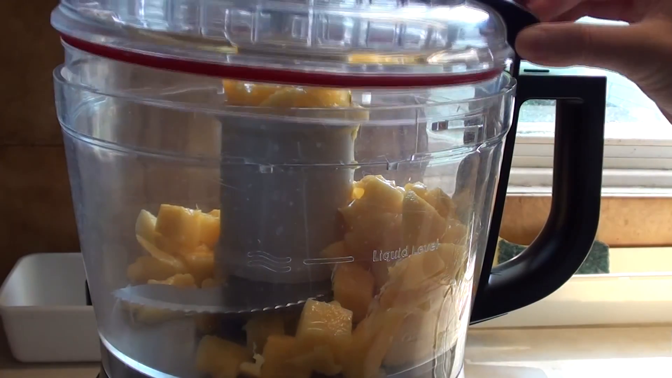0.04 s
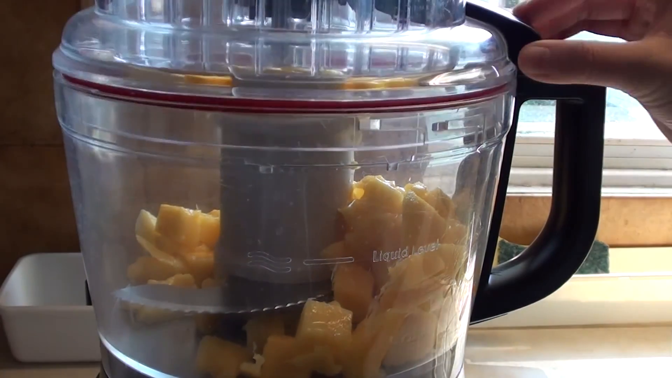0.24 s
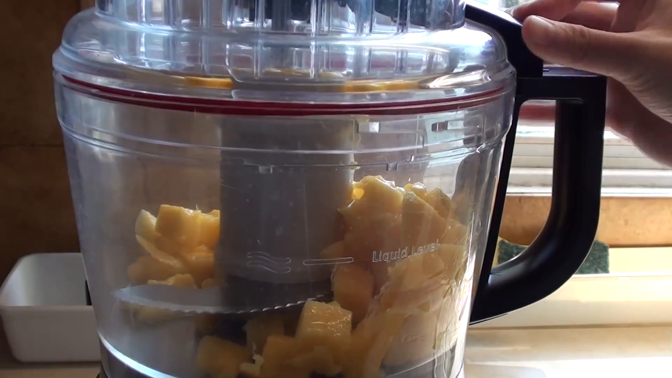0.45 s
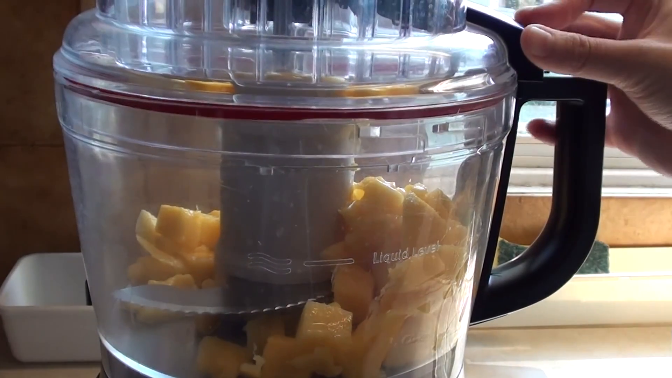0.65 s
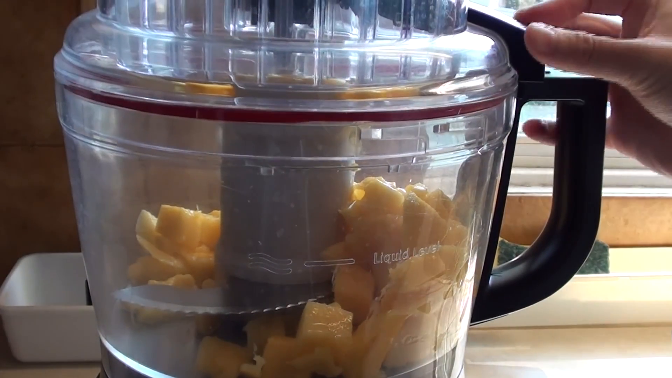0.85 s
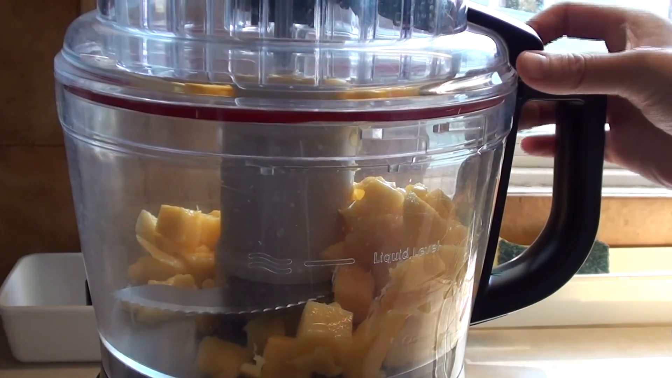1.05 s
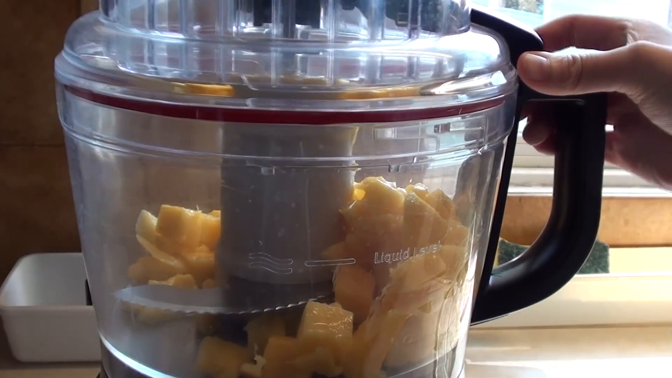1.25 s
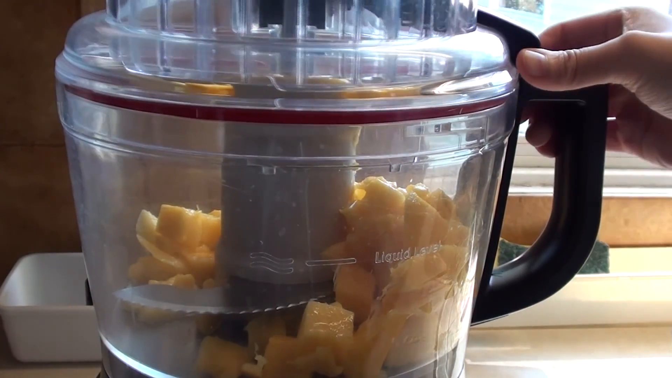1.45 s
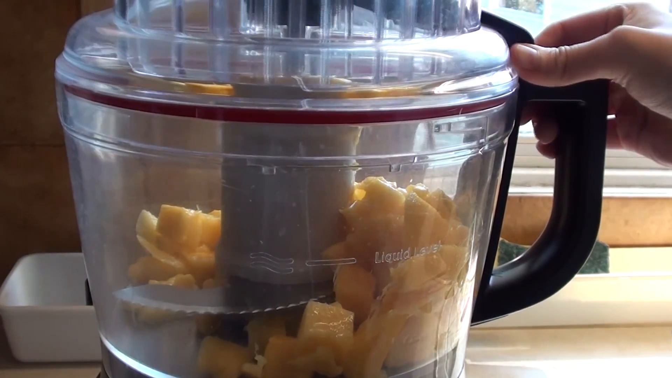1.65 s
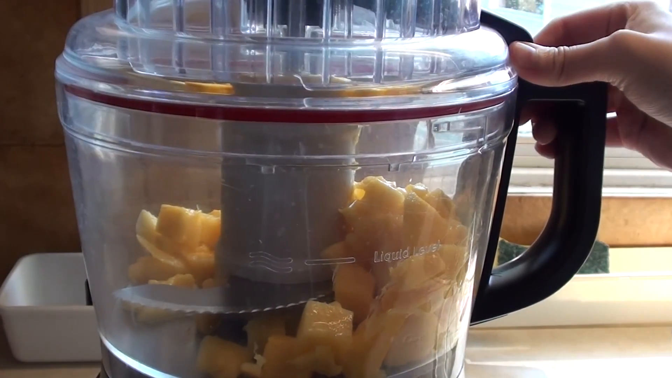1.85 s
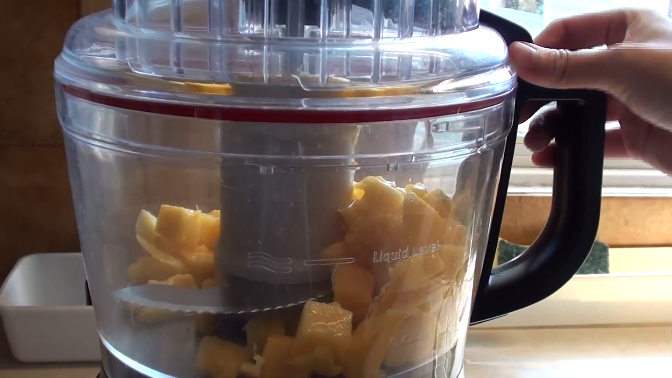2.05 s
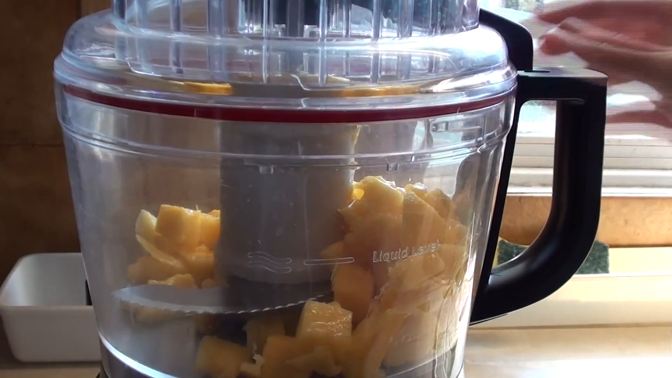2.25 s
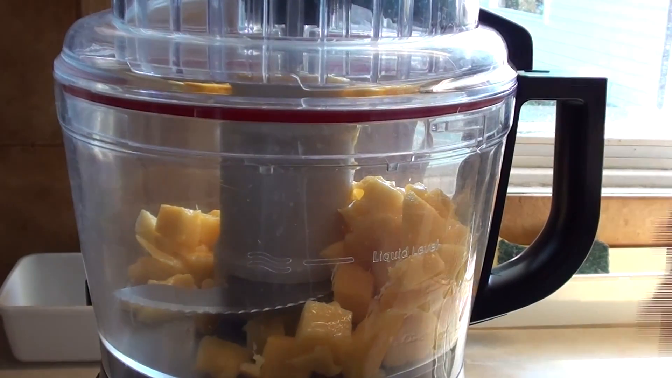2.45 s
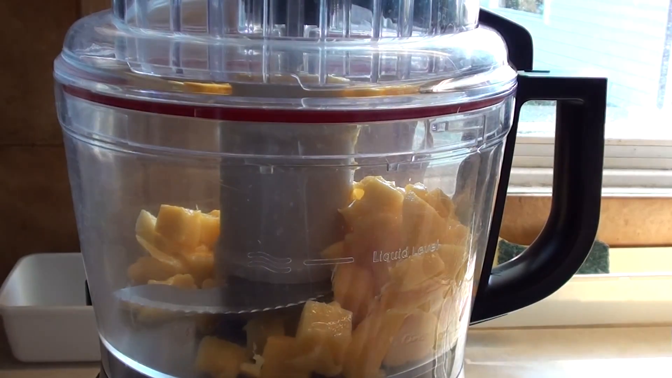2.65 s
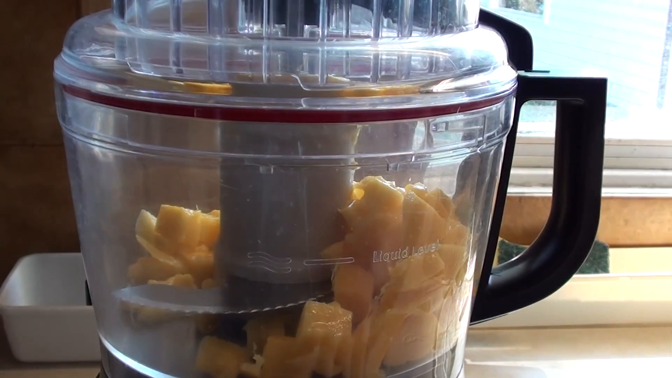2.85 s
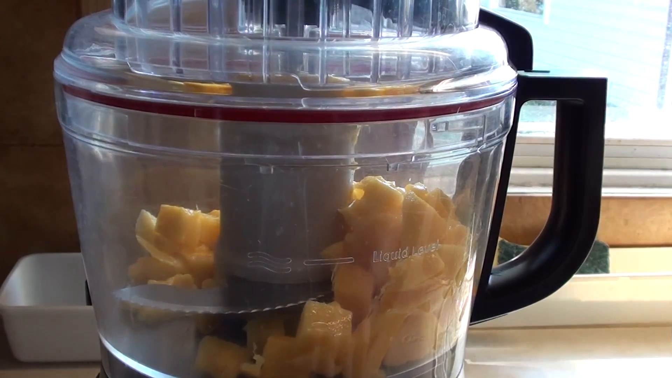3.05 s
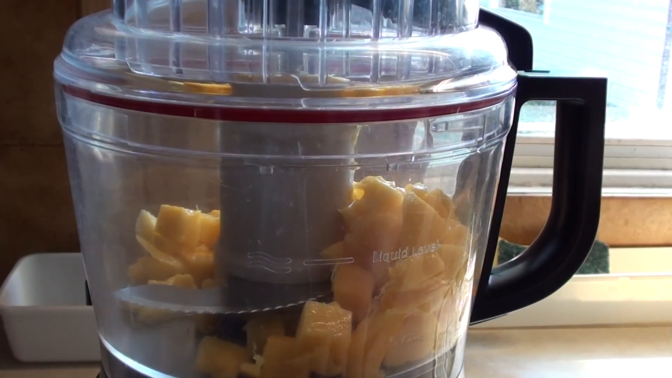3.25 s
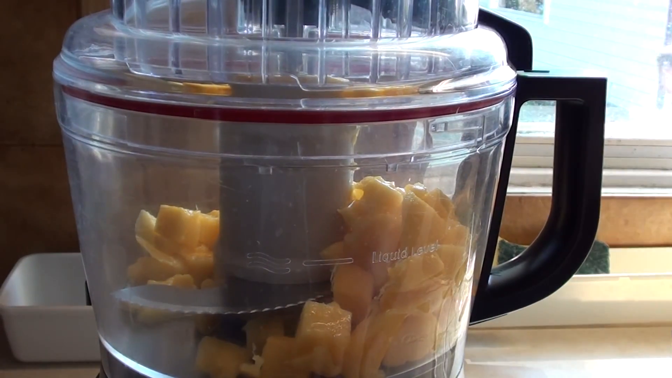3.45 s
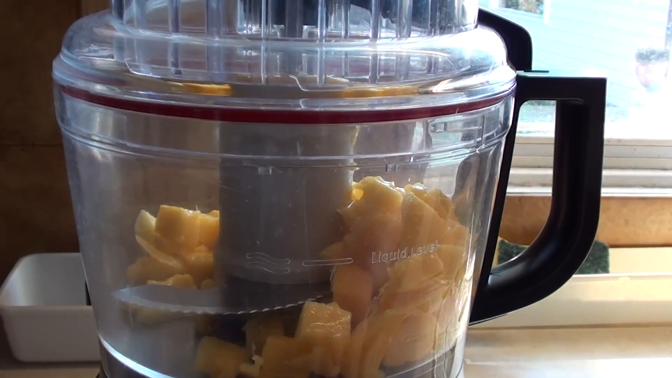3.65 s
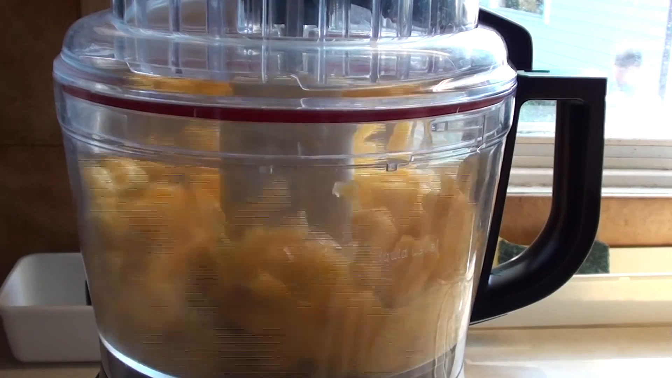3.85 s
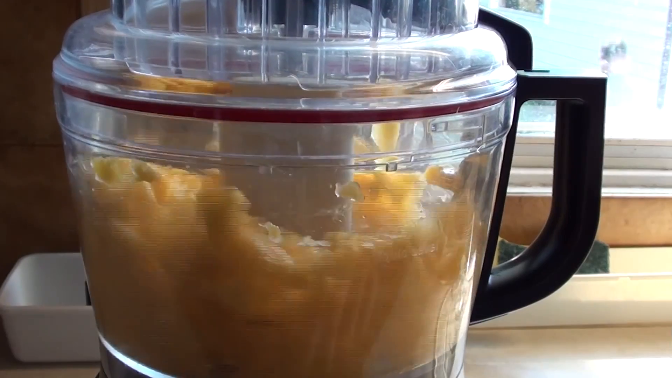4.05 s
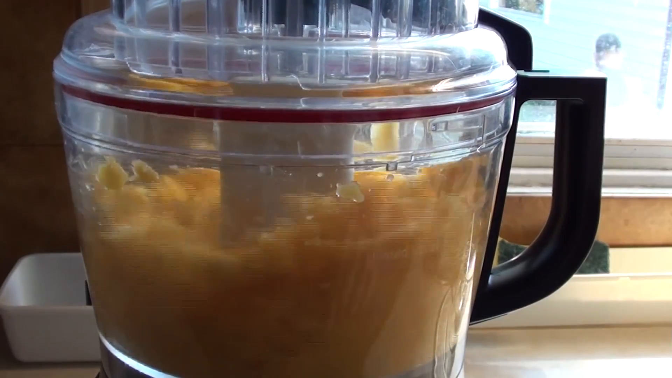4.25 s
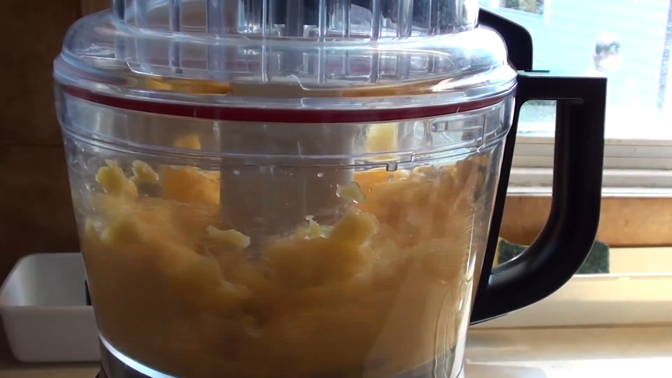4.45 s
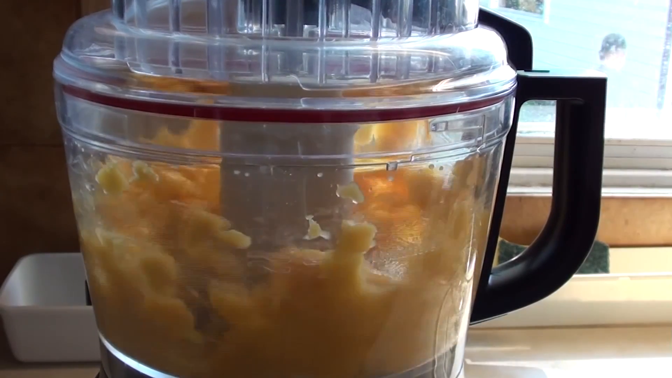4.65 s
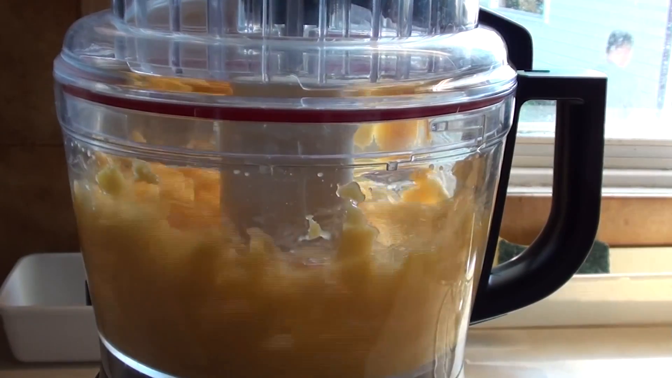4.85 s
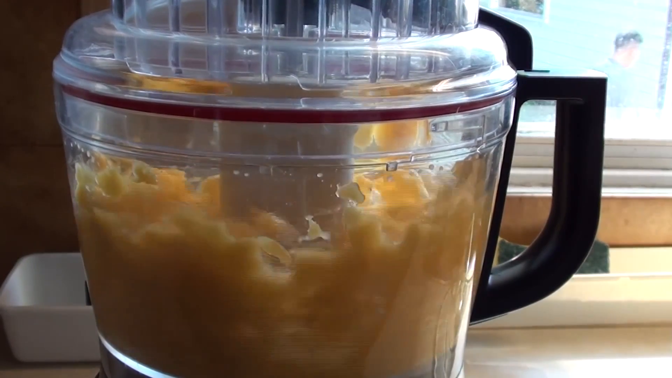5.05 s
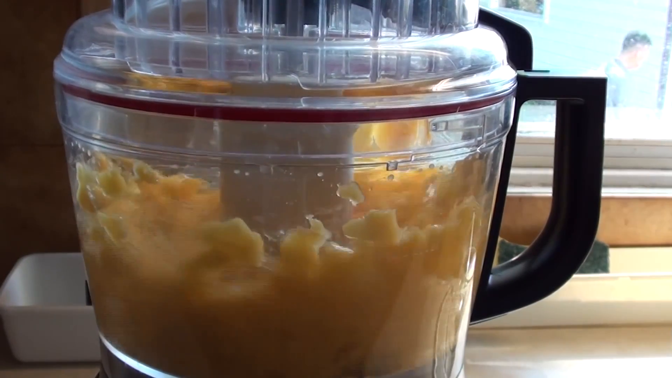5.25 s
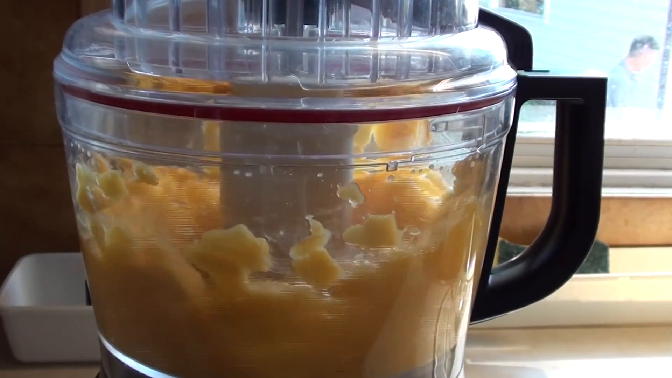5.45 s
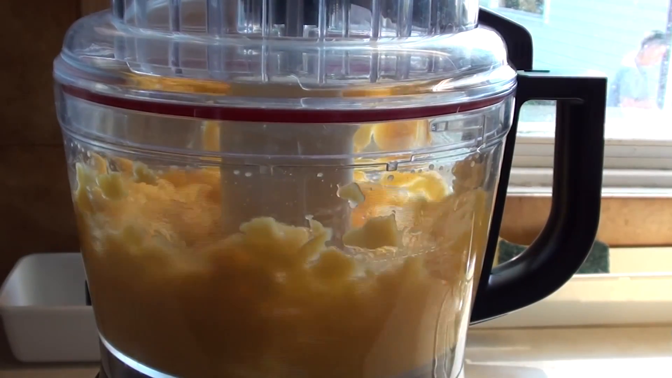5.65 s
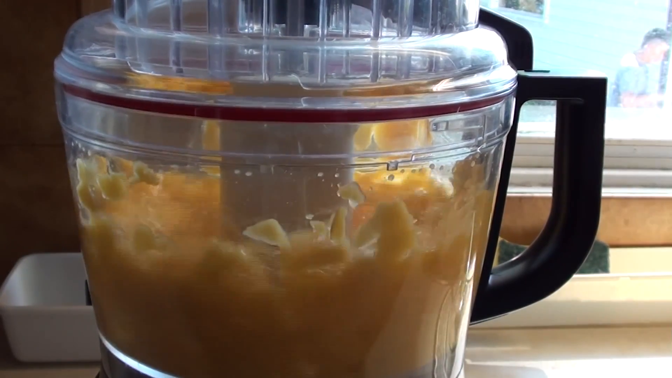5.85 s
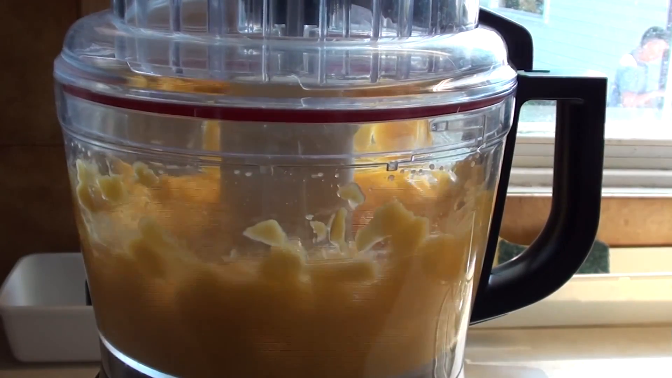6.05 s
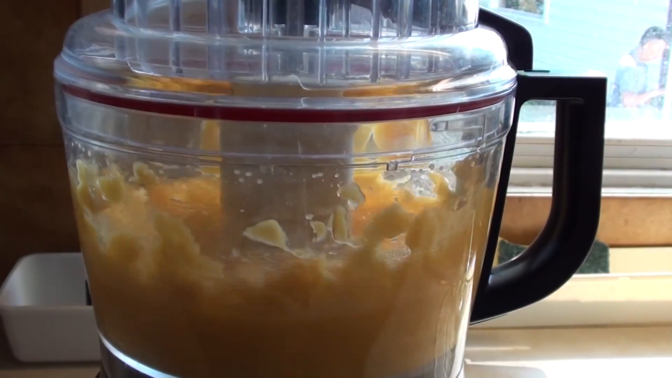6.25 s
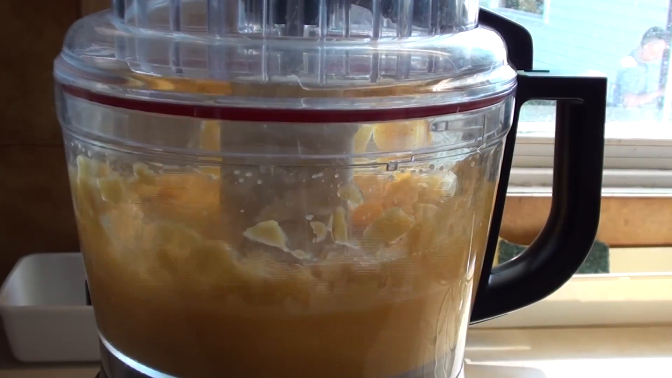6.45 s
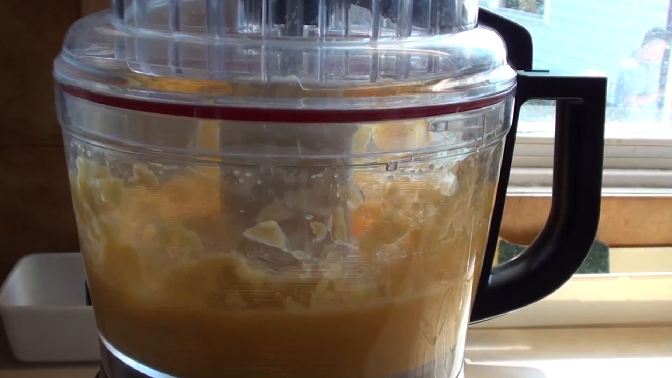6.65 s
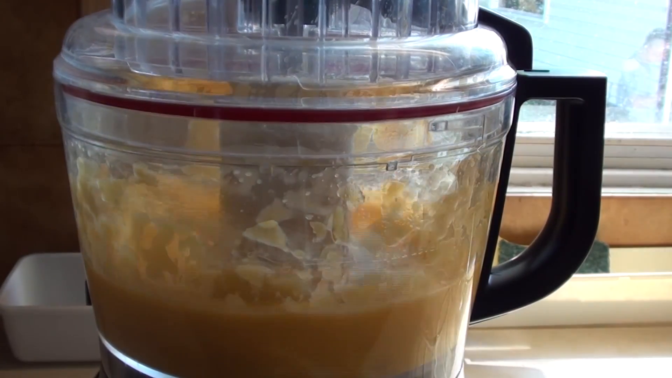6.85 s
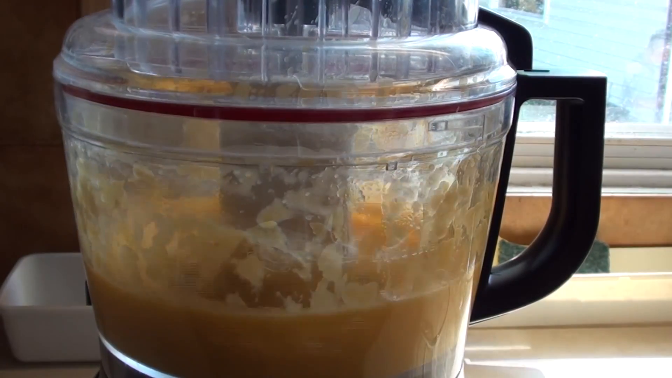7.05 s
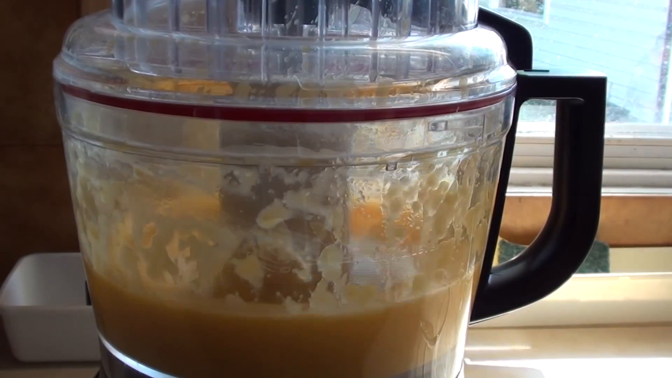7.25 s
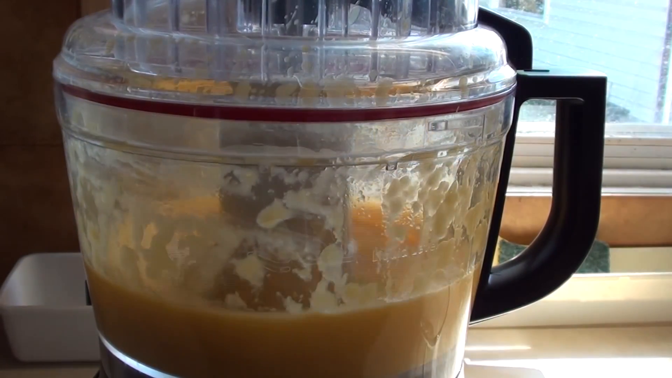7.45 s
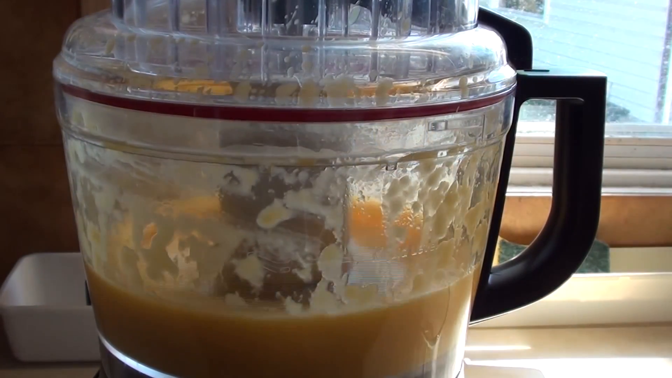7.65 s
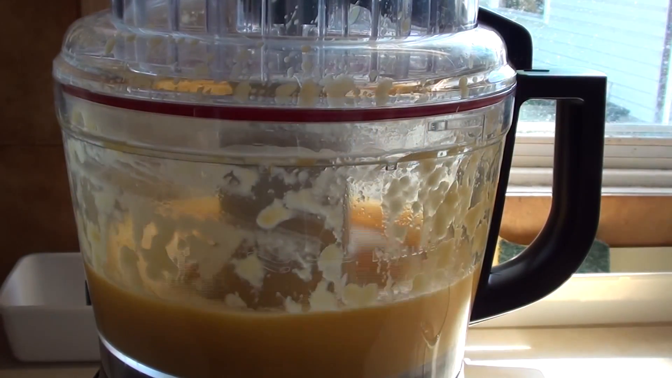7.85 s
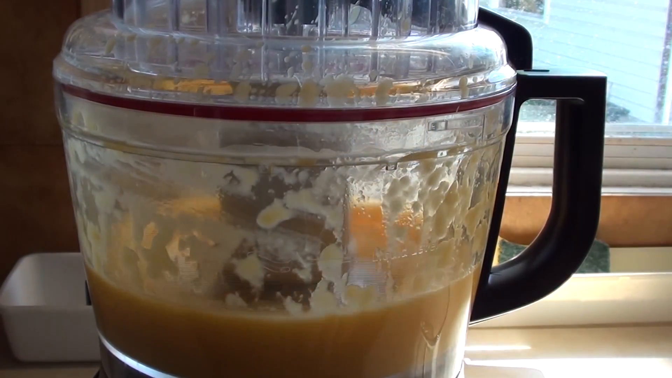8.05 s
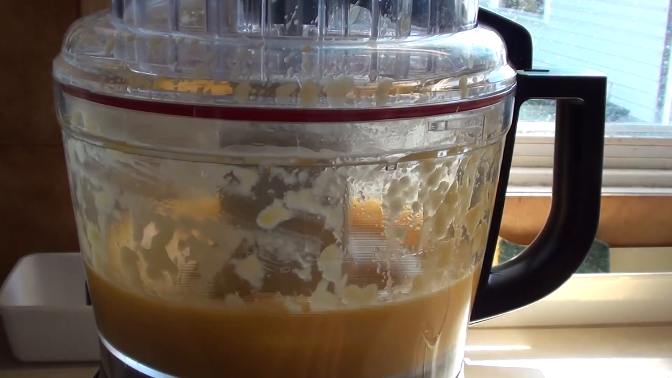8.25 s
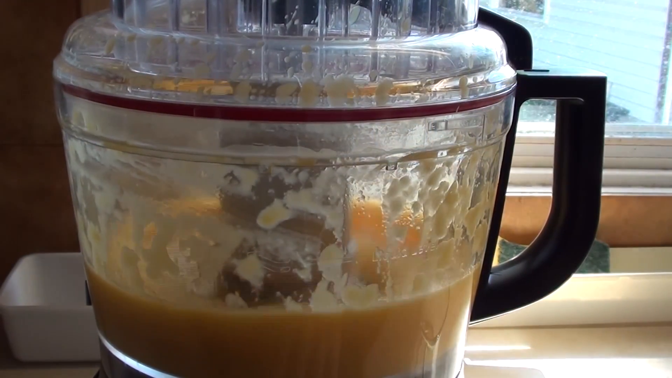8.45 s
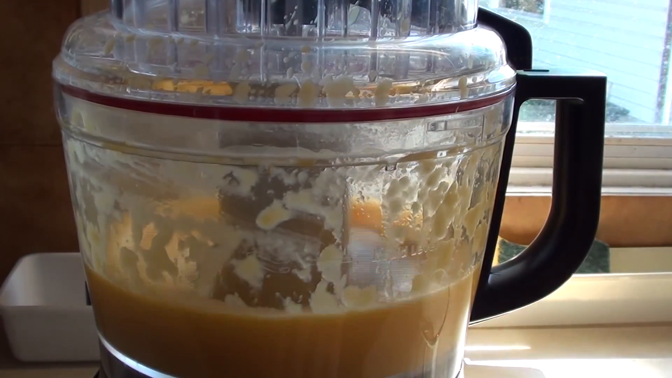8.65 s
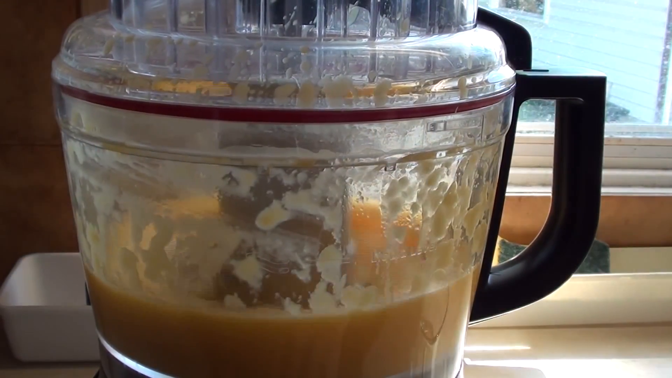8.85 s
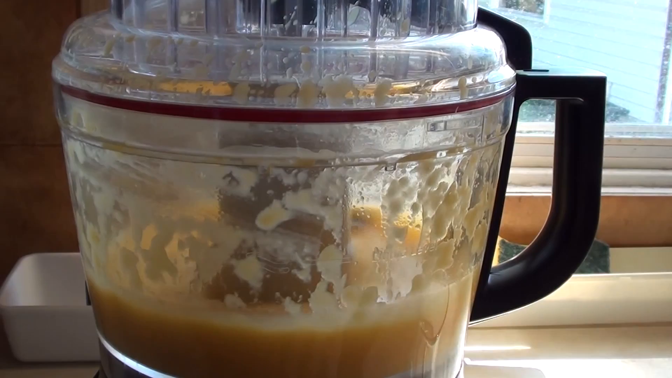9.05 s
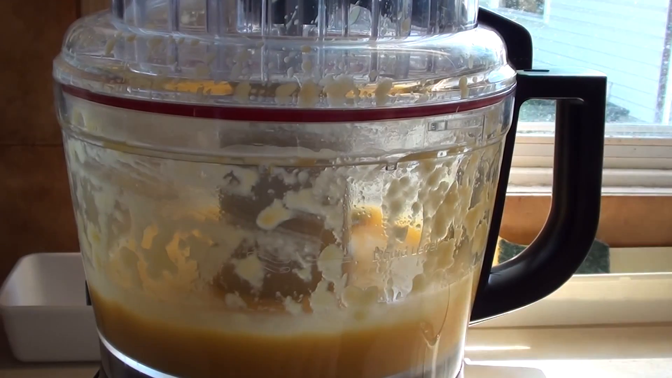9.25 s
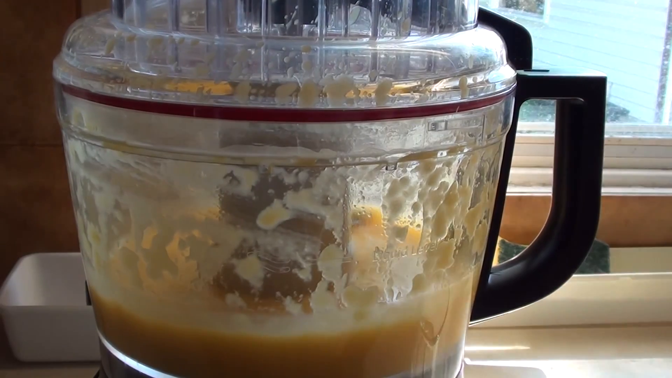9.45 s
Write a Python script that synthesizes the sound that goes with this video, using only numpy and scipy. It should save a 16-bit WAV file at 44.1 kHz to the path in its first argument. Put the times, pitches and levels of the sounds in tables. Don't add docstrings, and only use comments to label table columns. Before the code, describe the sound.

Close up in a small kitchen, a hand seats a thick plastic lid with a flurry of clicks and hollow knocks, then snaps the latch. A faint brushing and quiet hiss follow. A button clacks and the food processor starts abruptly, growling and whining as fruit chunks tumble, then running smoother with a fast regular knocking. It stops with jolting clicks and a brief final rub.

```python
import sys
import numpy as np
from scipy import signal
from scipy.fft import rfft, irfft, next_fast_len
from scipy.io import wavfile
from scipy.ndimage import uniform_filter1d

SR = 44100
rng = np.random.default_rng(int(sys.argv[2]) if len(sys.argv) > 2 else 0)


def pcm_store(signal):
    levels = np.round(np.clip(np.atleast_2d(signal), -1, 1) * 32767)
    wavfile.write(sys.argv[1], SR, levels.astype(np.int16).T)


def amplitude_ratio(level_db):
    exponent = np.asarray(level_db, float) / 20
    return 10 ** exponent


N = 419391
TIME = np.arange(N) / SR

# f/Hz, level/dB per Hz
BOWL_THUD = [(40, -12), (150, 1.5), (205, 1), (290, -2.5), (370, 0.5), (520, -2.5), (900, -6),
             (1500, -48.5)]
# f/Hz, level/dB per Hz
WALL_CRACK = [(300, -52), (800, -12.5), (1500, -3.5), (2500, -8.5), (4000, -16), (8000, -41)]


def evened(x):
    return x / np.sqrt(np.mean(x ** 2) + 1e-20)


def read(points, hz):
    f, value = np.transpose(points)
    return np.interp(np.log(hz + 1), np.log(f + 1), value)


def curves(rows):
    s, *columns = np.transpose(rows)
    return [np.interp(TIME, s, column) for column in columns]


def during(rows, fade_s=0.014):
    return np.clip(np.minimum(TIME - rows[0][0], rows[-1][0] - TIME) / fade_s, 0, 1)


def add(mix, s, sound):
    part = mix[round(s * SR):][:len(sound)]
    part += sound[:len(part)]


def shaped(x, gain):
    size = next_fast_len(x.shape[-1], real=True)
    spectrum = rfft(x, size) * gain(np.fft.rfftfreq(size, 1 / SR))
    return irfft(spectrum, size)[..., :x.shape[-1]]


def smooth_twice(x, first, second):
    return uniform_filter1d(uniform_filter1d(x, first, 0), second, 1 if x.ndim > 1 else 0)


def wander(length):
    return evened(smooth_twice(rng.standard_normal(N), length, length))


def noise(points, patchy_db=1.5, peaks=()):
    hz = np.fft.rfftfreq(1024, 1 / SR)
    real, imaginary, patches = rng.standard_normal((N // 256 + 5, 513, 3)).T
    patches = evened(smooth_twice(patches, 14, 8))
    colour = amplitude_ratio(read(points, hz))
    for f, width, db in peaks:
        colour = colour + amplitude_ratio(db) / (1 + ((hz - f) / (0.45 * width)) ** 2)
    z = (real + 1j * imaginary) * colour[:, None] * amplitude_ratio(patchy_db * patches)
    return evened(signal.istft(z, nperseg=1024, noverlap=768)[1][:N])


def ring(chance, gain, rise_s, t60, blow=0.37, tail=0.31):
    t = np.arange(len(chance)) / SR
    rise = (1 - np.exp(-t / rise_s)) ** 2
    decay = amplitude_ratio(-60 * t / (blow * t60)) + tail * amplitude_ratio(-60 * t / t60)
    sound = shaped(chance, gain) * rise * decay
    return sound / abs(sound).max()


def knock(crack_db, thud_db, tick_db, hz, chance):
    # f/Hz, level/dB per Hz
    latch_tick = [(1500, -8.5), (3500, -9.5), (5200, -3), (7500, 0), (10000, -8.5), (13000, -15),
                  (16000, -25)]
    t60 = np.clip(0.066 - 0.001 * (thud_db - crack_db), .015, .4)
    hardness = np.clip(0.021 * (tick_db - crack_db), -.7, .7)

    def wall_gain(f):
        return amplitude_ratio(read(WALL_CRACK, f)) + 1.25 / (1 + ((f - hz) / 110) ** 2)

    def latch_gain(f):
        return amplitude_ratio(read(latch_tick, f)) * (f / 7000 + .01) ** hardness

    crack = ring(chance[0], wall_gain, 0.00081, t60)
    thud = ring(chance[1], lambda f: amplitude_ratio(read(BOWL_THUD, f)), 0.0025, 1.8 * t60)
    tick = ring(chance[2], latch_gain, 0.00026, 0.87 * t60, blow=0.21, tail=0.16)
    return amplitude_ratio(crack_db) * crack + amplitude_ratio(thud_db + 0.4) * thud + amplitude_ratio(tick_db - 2.0) * tick


def set_down():
    level_db, t60 = -30.5, 0.37
    t = TIME[:SR // 2]
    dying = shaped(rng.standard_normal(SR // 2),
                   lambda f: amplitude_ratio(read(BOWL_THUD, f)) + 0.63 * amplitude_ratio(read(WALL_CRACK, 1.8 * f)))
    return evened(dying) * amplitude_ratio(level_db - 60 * t / t60)


def knocks():
    # t/s, crack level/dB, thud level/dB, tick level/dB, crack f/Hz
    seating = [(0.001, -44, -26, -55, 1040), (0.017, -38, -35, -56, 980), (0.111, -23, -41, -31, 1460),
               (0.117, -22, -36, -43, 1470), (0.142, -20, -31.5, -18.5, 1090),
               (0.161, -15.5, -19, -16.5, 2250), (0.184, -19, -29, -19, 1090),
               (0.207, -26.5, -41, -18.5, 1100), (0.276, -21, -38, -13, 1260), (0.341, -47, -51, -55, 1210),
               (0.495, -41, -39, -44, 1100), (0.521, -42, -60, -56, 1490), (0.54, -29.5, -56, -30, 2210),
               (0.555, -41, -50, -53, 1170), (0.568, -40, -42, -29, 2210), (0.574, -27, -40, -27, 1170),
               (0.588, -15.5, -20.5, -17.5, 870), (0.596, -20, -19.5, -22, 870),
               (0.599, -20, -29, -29, 725), (0.707, -37, -29.5, -55, 760), (0.741, -36, -57, -34, 990),
               (0.837, -42, -57, -34, 1430), (0.845, -25.5, -52, -29.5, 1010), (0.917, -39, -51, -42, 990)]
    # t/s, crack level/dB, thud level/dB, tick level/dB, crack f/Hz
    locking = [(1.009, -50, -46, -54, 865), (1.064, -37, -62, -18.5, 1130), (1.137, -30.5, -43, -34, 1320),
               (1.212, -46, -38.5, -43, 2270), (1.271, -42, -41, -56, 870), (1.331, -31, -40, -18, 1780),
               (1.362, -51, -65, -28, 880), (1.381, -24.5, -22.5, -43, 870), (1.427, -27, -40, -22, 1320),
               (1.465, -49, -34.5, -55, 850), (1.497, -28.5, -49, -19.5, 1320),
               (1.536, -25.5, -48, -18.5, 2340), (1.563, -30, -33, -33, 1834), (1.571, -26, -28, -29, 1190),
               (1.579, -29, -34, -21.5, 1190), (1.594, -30, -51, -27, 1190), (1.62, -30, -24, -40, 1570),
               (1.627, -28, -27.5, -6.5, 1340), (1.657, -34, -45, -19.5, 915),
               (1.679, -21.5, -39, -29, 1650), (1.682, -21, -26, -24, 900), (1.687, -15.5, -24, -15.5, 990),
               (1.692, -27, -36, -26, 1270), (1.708, -20, -14.5, -34, 865)]
    # t/s, crack level/dB, thud level/dB, tick level/dB, crack f/Hz
    letting_go = [
        (1.72, -29, -24, -40, 850),
        (1.982, -54, -39, -57, 1450),
        (2.007, -39, -54, -53, 1200),
        (2.015, -35, -41, -25.5, 1530),
        (2.034, -32, -45, -25, 1220),
        (2.055, -32, -55, -29, 1320),
        (2.101, -36, -50, -34, 1210),
        (2.118, -15, -18.5, -23.5, 1230),
        (2.155, -26, -32.5, -22, 3970),
        (2.24, -19, -25.5, -27.5, 870),
    ]
    # t/s, crack level/dB, thud level/dB, tick level/dB, crack f/Hz
    switching = [(3.572, -49, -43, -60, 960), (3.63, -20.5, -19, -33.5, 860), (3.751, -33, -35, -26, 780),
                 (3.79, -33, -38, -31, 750), (3.847, -37, -35, -36, 1400), (8.88, -28, -39.5, -37, 880),
                 (8.973, -28, -38, -23.5, 808), (8.985, -32, -43, -42, 1490), (9.03, -41, -43, -36, 800),
                 (9.052, -43, -42, -38, 1510), (9.079, -30, -35, -37, 790), (9.157, -36, -40, -37, 1030)]
    out = np.zeros(N)
    rows = seating + locking + letting_go + switching
    for row, chance in zip(rows, rng.standard_normal((len(rows), 3, 8192))):
        add(out, row[0], knock(*row[1:], chance))
    return out


def microphone_hiss():
    # f/Hz, level/dB per Hz
    hiss_colour = [(13, -43), (22, 7), (183, 1), (353, -2), (453, -3), (534, -2), (703, -3.5), (1090, -4),
                   (3970, -8.5), (7270, -8.5), (14500, -12.5), (15700, -17)]
    duck = during([[3.752], [9.1]], fade_s=.025)
    return amplitude_ratio(-55.2 - 9 * duck), noise(hiss_colour, patchy_db=0.34)


def kitchen(x):
    # f/Hz, t60/s
    room_t60 = [(150, 0.47), (500, 0.34), (2000, 0.34), (6000, 0.24), (12000, 0.095)]
    taps = np.zeros((2, SR // 2))
    at = np.arange(200, SR // 2 - 20, 20) + rng.integers(0, 20, (2, (SR // 2 - 201) // 20))
    np.put_along_axis(taps, at, rng.choice([-1., 1.], at.shape), 1)
    hz, t, z = signal.stft(taps, SR, nperseg=256)
    decay = amplitude_ratio(-60 * t / read(room_t60, hz)[:, None])
    tail = signal.istft(z * decay, SR, nperseg=256)[1]
    return signal.fftconvolve(x[None], tail / np.linalg.norm(tail[0]), axes=1)[:, :N]


def brush(start, length, db):
    u = (TIME - start) / length
    return np.clip(np.minimum(u, 1 - u) / .06, 0, 1) * amplitude_ratio(db - 9.5 * np.clip(u, 0, 1))


def rubbing():
    # t/s, length/s, level/dB
    strokes = [
        (2.29, .71, -56),
        (9.238, .055, -47),
    ]
    # f/Hz, level/dB per Hz
    friction = [(1500, -1), (4000, -6.5), (7500, -1.5), (11000, -10), (15000, -16)]
    return noise(friction, patchy_db=2.5) * sum(brush(*stroke) for stroke in strokes)


def slack():
    # free t/s, catch t/s, sag/dB per s, jolt level/dB
    catches = [
        (3.758, 3.79, 330, 1.5),
        (3.81, 3.847, 120, 2.2),
        (3.88, 3.92, 40, 3.5),
        (3.945, 3.957, 150, 5.0),
        (8.945, 8.975, 420, 4.5),
        (8.99, 9.081, 190, 6.5),
        (9.1, 9.3, 45, 0.1),
    ]
    jolt_s = .035
    slack_db = np.zeros(N)
    for free, catch, sag_db, jolt_db in catches:
        slack_db -= sag_db * (TIME - free) * (TIME > free) * (TIME < catch)
        slack_db += jolt_db * np.clip(1 - (TIME - catch) / jolt_s, 0, 1) * (TIME > catch)
    return slack_db


def layers(mesh_hz, effort_db, lumps):
    slack_db = slack()
    whine_db = 1.3 * 20 * np.log10(mesh_hz / 516)
    gear_db = -36.7 + effort_db + .9 * slack_db
    housing_db = -36.2 + .8 * effort_db + whine_db + 1.1 * slack_db
    slosh_db = -61 + 10.5 * lumps + 3.0 * wander(2500) + .3 * slack_db
    spray_db = -52.5 + .75 * effort_db + whine_db + 1.3 * slack_db
    return gear_db, housing_db, slosh_db, spray_db


def band_rms(x, lo_hz, hi_hz):
    return np.sqrt(np.mean(shaped(x, lambda hz: (hz > lo_hz) & (hz < hi_hz)) ** 2))


def resonate(x, hz, width):
    turn = np.exp(2j * np.pi * np.cumsum(hz * np.ones(len(x))) / SR)
    r = np.exp(-np.pi * width / SR)
    return evened((turn * signal.lfilter([1], [1, -2 * r, r * r], x / turn)).real)


def case(hz):
    # f/Hz, half width/Hz, level/dB
    shell_modes = [(870, 45, -1), (1045, 41, -4), (1320, 45, 2), (1553, 80, -0.5)]
    return sum(amplitude_ratio(db) / (1 + ((hz - f) / width) ** 2) for f, width, db in shell_modes)


def gear_mesh(mesh_hz, lumps, rattle, turn, spot, knock_db, on):
    # multiple of the mesh pitch, width/Hz, level/dB
    mesh_orders = [(1, 35, -9.5), (2, 60, -5.5), (2.58, 60, -6), (3, 64.5, 0), (4, 132, -5), (6, 50, -16)]
    white = rng.standard_normal(N)[on]
    orders = np.zeros(N)
    orders[on] = evened(sum(amplitude_ratio(db) * resonate(white, k * mesh_hz[on], width) for k, width, db in mesh_orders))
    loaded_hz = mesh_hz * (1 + (0.017 + 0.008 * lumps) * rattle)
    teeth = 2 * np.pi * np.cumsum(loaded_hz) / SR
    third = case(3 * mesh_hz) * np.sin(3 * teeth)
    second = case(2 * mesh_hz) * np.sin(2 * teeth)
    gears = amplitude_ratio(-4.5) * (1 - 0.78 * spot) * orders
    gears += (0.3 + amplitude_ratio(1.59 * knock_db - 3.5) * spot) * third
    gears += 0.6 * (1 + 0.7 * np.cos(turn - 1.1)) * second
    return gears


def churning(rattle, spot, knock_db):
    # f/Hz, level/dB per Hz
    churn_colour = [(100, -12), (200, -5.5), (300, -6), (650, -8.5), (900, -1), (1500, -0.5), (2100, -1.5),
                    (2800, -7), (3600, -7.5), (4300, -16.5), (6000, -11), (9000, -54)]
    return noise(churn_colour, patchy_db=1.8) * amplitude_ratio(0.6 * knock_db * spot + 0.88 * rattle - 0.5)


def housing_and_spray(rattle, turn, spot, knock_db):
    # f/Hz, level/dB per Hz
    spray_colour = [(3000, -33), (4300, -21), (5300, -13), (6200, -8.5), (7000, -12.5), (8000, -16),
                    (10000, -25.5), (12500, -35), (16000, -36)]
    # f/Hz, width/Hz, level/dB
    housing_modes = [(5320, 61, -10.5), (5880, 39, -1.5), (5970, 45, -14), (6105, 48, -4.5),
                     (6385, 105, 0.5), (6740, 56, -17), (7430, 170, -14.5), (9500, 300, -25),
                     (11300, 260, -33)]
    planets = np.cos(3 * turn) + np.cos(6 * turn)
    swing = amplitude_ratio(0.28 * knock_db * spot + 0.78 * rattle + 0.89 * planets)
    spray = noise(spray_colour, patchy_db=-0.06, peaks=housing_modes) * swing
    high = shaped(spray, lambda hz: 1 / (1 + (8800 / (hz + 1)) ** 12))
    return spray - high, evened(high)


def machine():
    # t/s, gear mesh f/Hz, effort level/dB, share of fruit still in lumps (about 0-1)
    drive = [
        (3.742, 295, -4.5, 1.1),
        (3.96, 445, -2.2, .8),
        (4.04, 516.4, -.3, 1.),
        (6.1, 511, 0, .75),
        (7.0, 519, -5.2, .4),
        (7.4, 527, -4.3, .03),
        (8.84, 519, -3.5, .25),
        (8.93, 435, -5, .6),
        (9.24, 181, -11, .9),
    ]
    # f/Hz, level/dB per Hz
    slosh_colour = [(30, -26), (90, -14), (150, -4), (200, 1.5), (260, -11), (400, -15), (800, -49)]
    turns_per_s, knock_at_s = 12.24, 7.98
    mesh_hz, effort_db, lumps = curves(drive)
    gear_db, housing_db, slosh_db, spray_db = layers(mesh_hz, effort_db, lumps)
    knock_db = 9.1 - 9.2 * lumps
    turn = 2 * np.pi * turns_per_s * (TIME - knock_at_s)
    spot = np.exp(9 * (np.cos(turn) - 1))
    rattle = wander(400)
    running = during(drive)
    on = running > 0
    gears = gear_mesh(mesh_hz, lumps, rattle, turn, spot, knock_db, on)
    gears += churning(rattle, spot, knock_db)
    housing, spray = housing_and_spray(rattle, turn, spot, knock_db)
    parts = amplitude_ratio(gear_db) * gears / band_rms(gears[on], 800, 2500)
    parts += amplitude_ratio(housing_db) * housing
    parts += amplitude_ratio(spray_db + 1) * spray
    parts += amplitude_ratio(slosh_db + 1.5) * noise(slosh_colour, patchy_db=-0.8)
    return parts * running


def mains_hum():
    # t/s, level/dB
    third_level = [(3.75, -47), (3.93, -58), (4.15, -51.5), (6.15, -49.5), (6.64, -66), (7.06, -52),
                   (7.65, -44), (8.86, -43)]
    hum_hz = 120.1
    inrush_db = 4.0 * np.exp(-abs(TIME - third_level[0][0]) / 0.25)
    levels_db = -50 + inrush_db, curves(third_level)[0], -61 + 2 * inrush_db
    hum = np.zeros(N)
    for k, db in zip((2, 3, 4), levels_db):
        hum += amplitude_ratio(db + 3.5) * np.sin(2 * np.pi * k * hum_hz * TIME)
    return hum * during(third_level)


def scene():
    # f/Hz, gain/dB
    side_colour = [(60, -23), (110, -43), (200, -18), (380, -23), (700, -19), (1290, -16), (2380, -14.5),
                   (4400, -14.5), (8120, -13), (15000, -24)]
    hands = knocks() + rubbing()
    add(hands, 0, set_down())
    motor = machine()
    wet, other = kitchen(hands + amplitude_ratio(-2.5) * motor)
    level, hiss = microphone_hiss()
    mid = hands + amplitude_ratio(-1) * motor + mains_hum() + amplitude_ratio(-11.5) * wet
    side = other + 0.18 * mid + amplitude_ratio(12.5) * level * hiss[::-1]
    side = shaped(side, lambda hz: amplitude_ratio(read(side_colour, hz) - 2.3))
    return mid + level * hiss + np.outer([1, -1], side)


def top_cut(x):
    return signal.sosfilt(signal.butter(12, 16830, fs=SR, output="sos"), x)


def record(dry):
    # f/Hz, level/dB
    response = [(20, -22), (60, -12.5), (110, -7.5), (150, -2.5), (210, 0), (15850, 0), (16300, -40)]
    heard = shaped(dry, lambda hz: amplitude_ratio(read(response, hz)))
    return top_cut(heard)


dry = scene()
out = record(dry)
pcm_store(out)
```